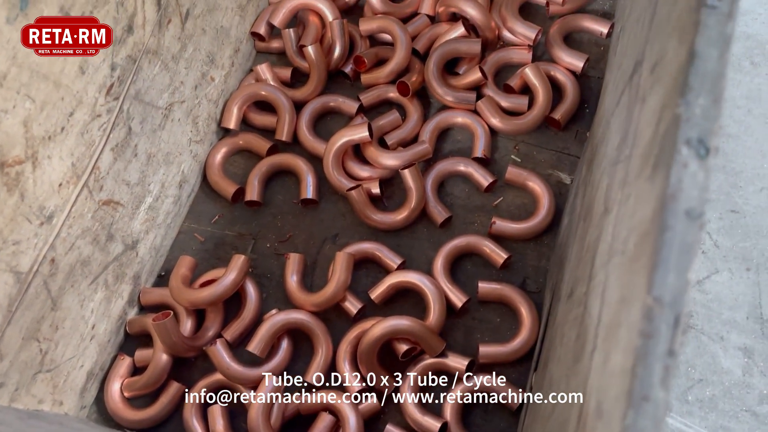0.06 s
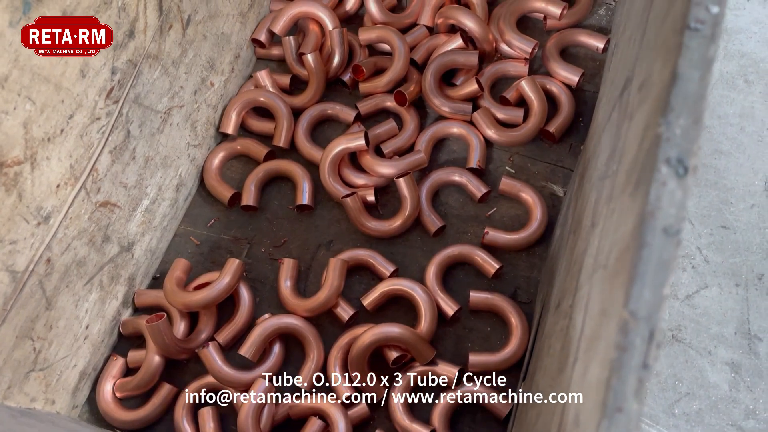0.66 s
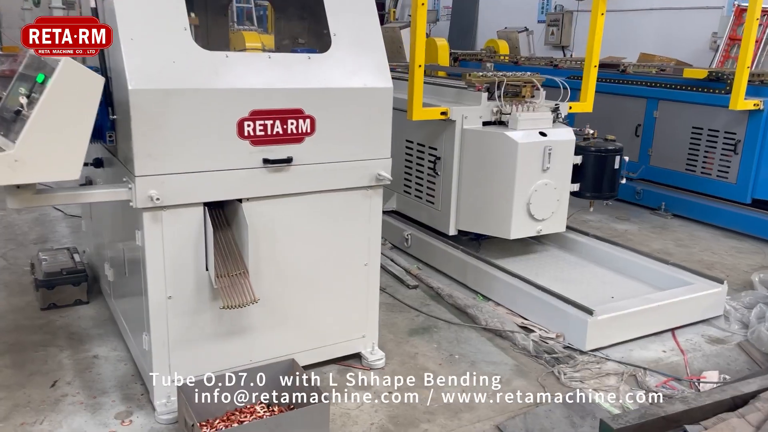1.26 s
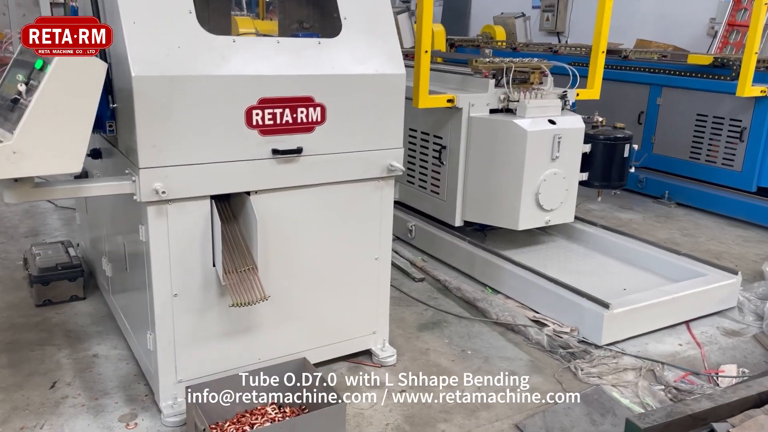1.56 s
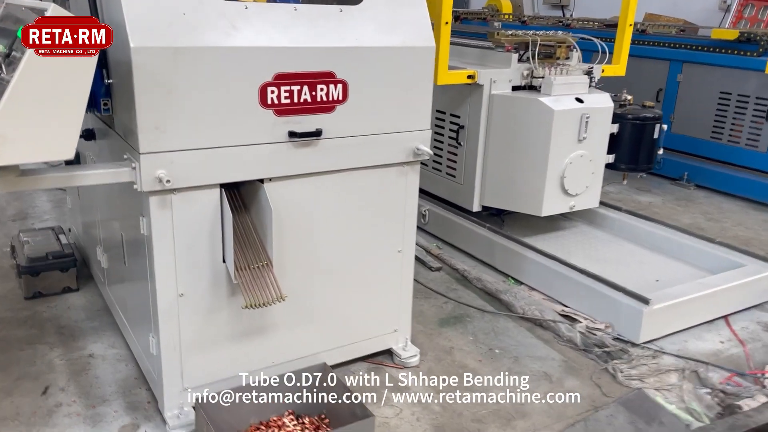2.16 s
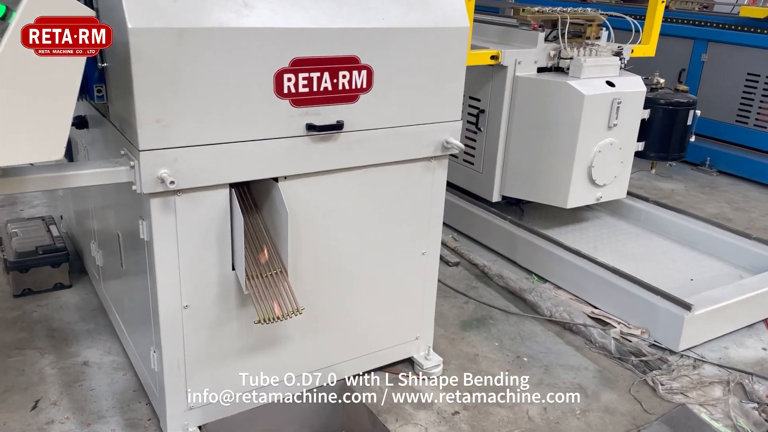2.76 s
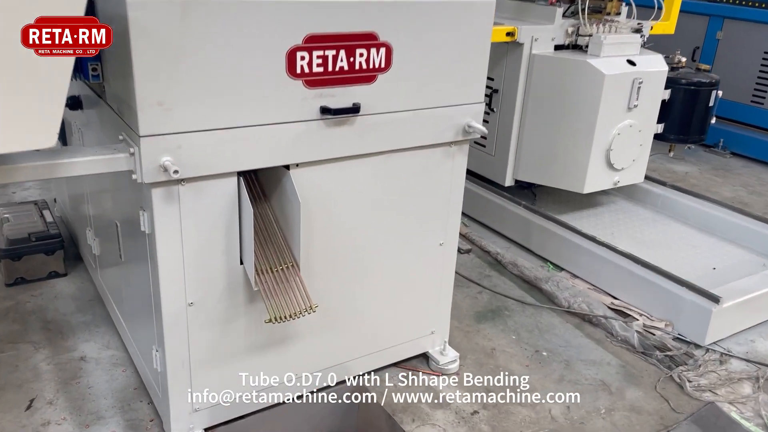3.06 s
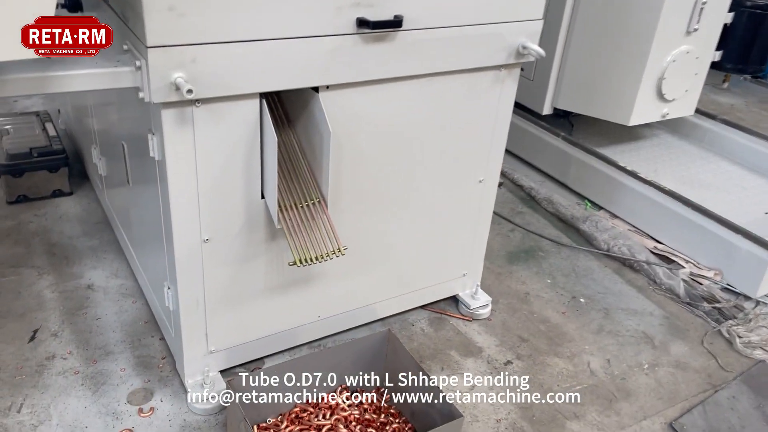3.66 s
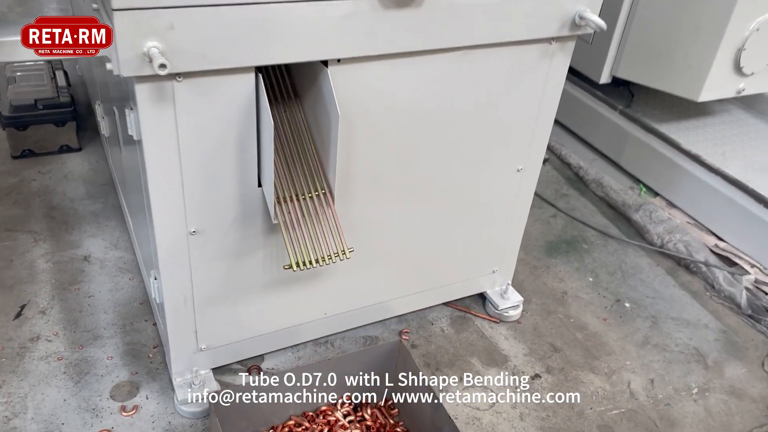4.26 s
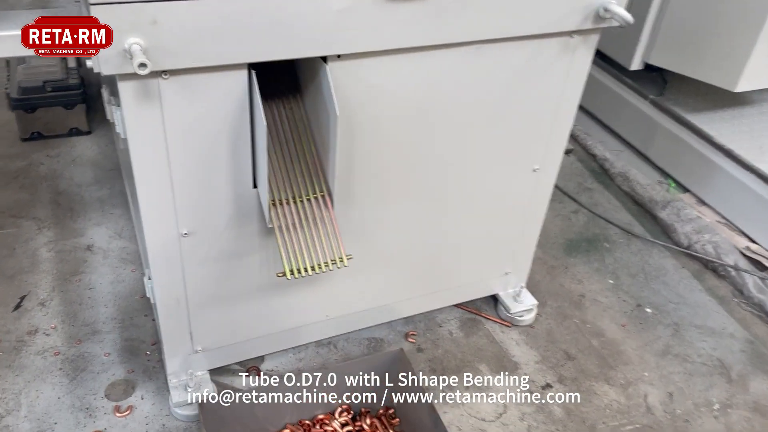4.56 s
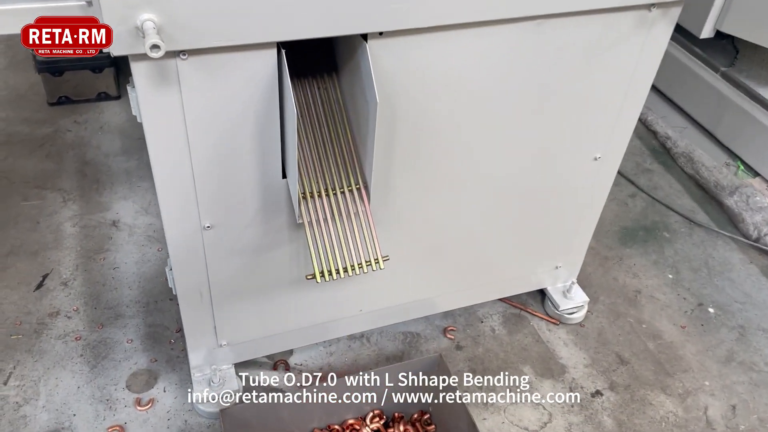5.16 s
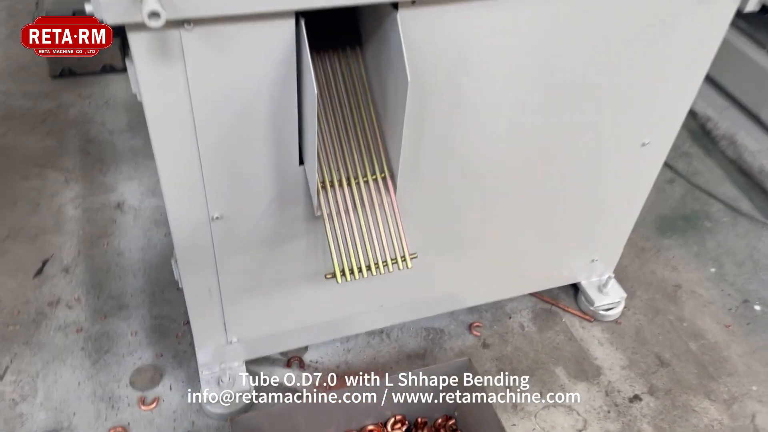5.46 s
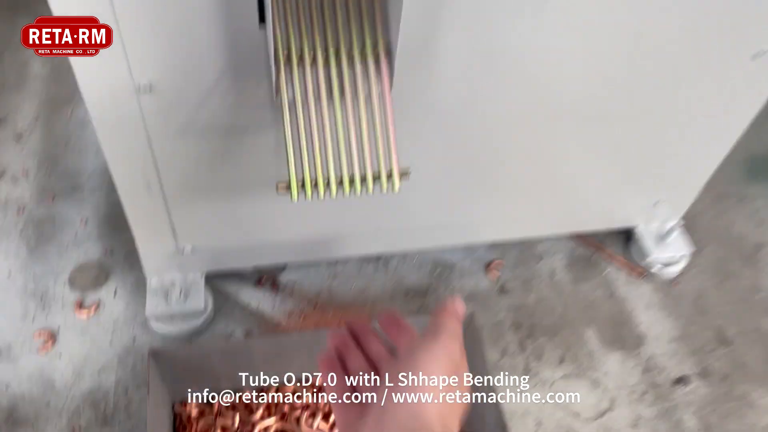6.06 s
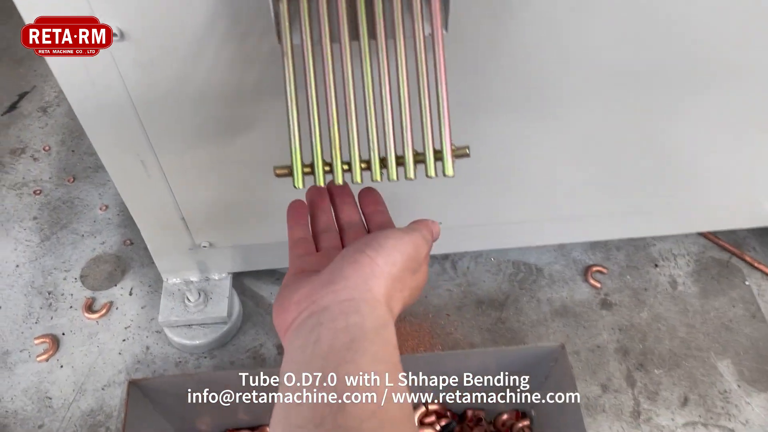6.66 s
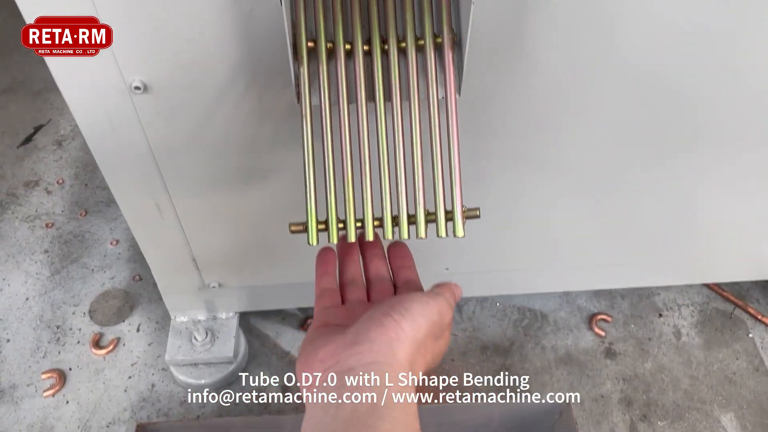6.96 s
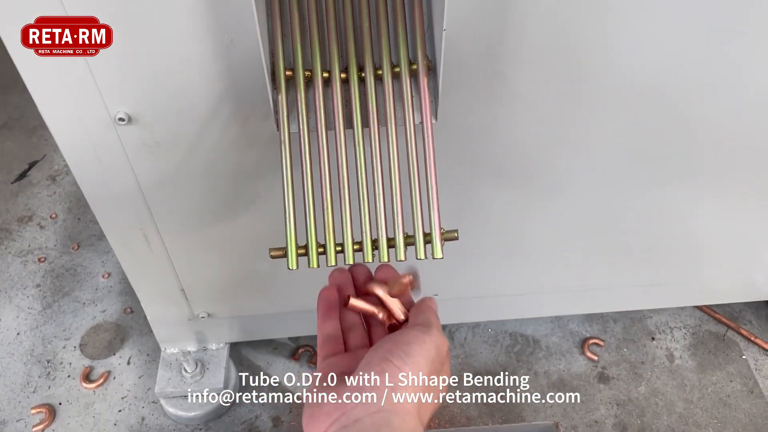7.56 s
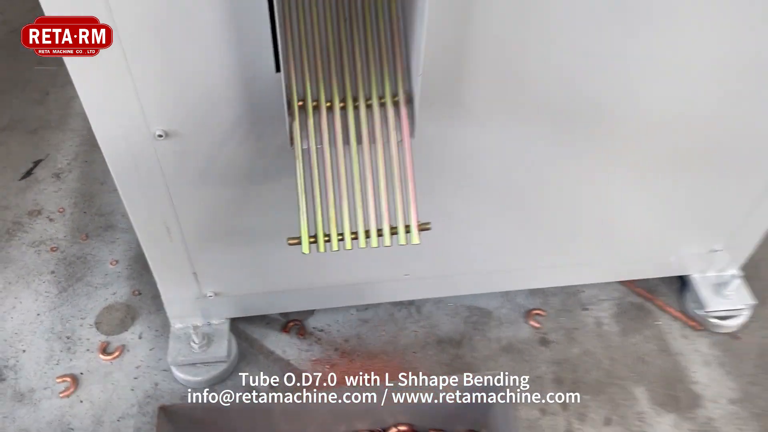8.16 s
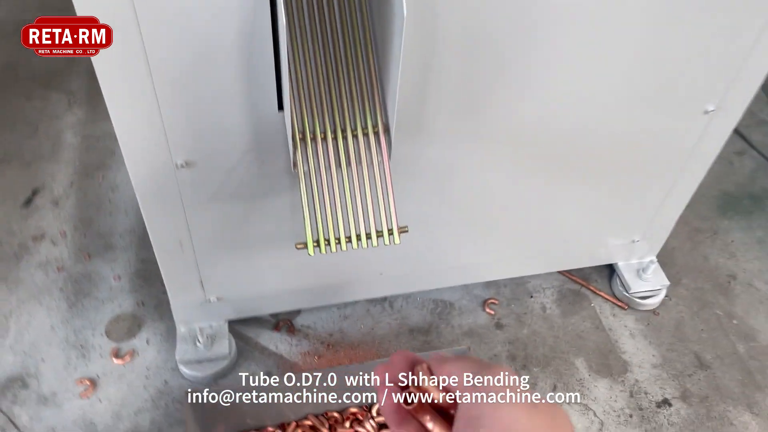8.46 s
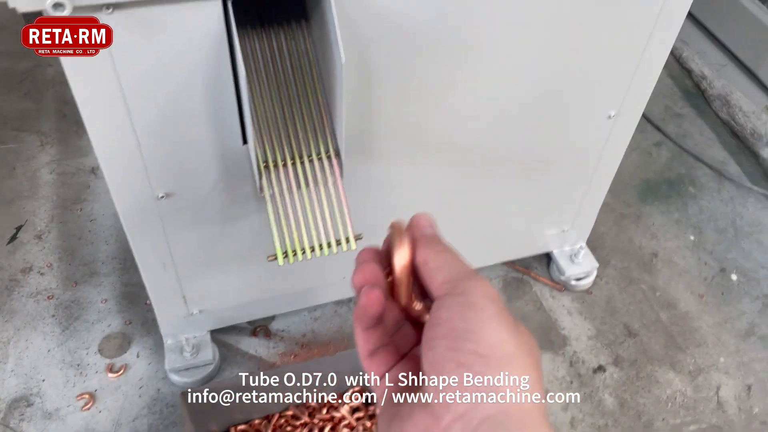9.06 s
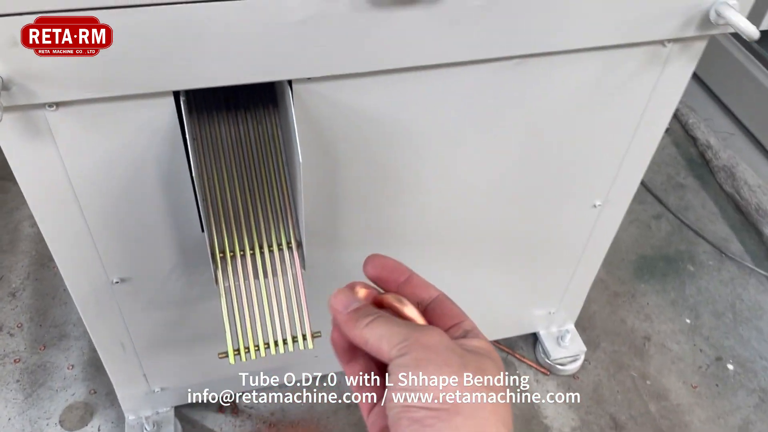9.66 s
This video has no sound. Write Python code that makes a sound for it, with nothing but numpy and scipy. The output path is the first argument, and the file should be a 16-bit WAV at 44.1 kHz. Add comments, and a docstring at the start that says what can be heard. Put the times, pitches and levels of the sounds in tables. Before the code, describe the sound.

In a factory hall, a moment of distant machine drone gives way suddenly to a close tube bender. A hydraulic hum swells and eases under irregular steel clacks, booming clamp knocks and low rumbles, with hissing air valves and short high whistles. Small metal parts drop sharply into a bin early on. The moving microphone ends up shielded by the machine's front, so the second cycle sounds softer.

```python
"""A moment of quieter shop noise with a drive coasting down, then an abrupt cut to a tube bender
already at work in the hall. In each cycle its hydraulic pump hums, the carriage rumbles, clamps knock
on the sheet-steel cabinet and dies clack; compressed air hisses, puffs from the valves and whistles
through a silencer. Finished bends drop into a bin. The moving microphone ends behind the front panel."""
import sys
import numpy as np
from scipy import signal
from scipy.fft import rfft, irfft
from scipy.io import wavfile

SR = 44100
rng = np.random.default_rng(int(sys.argv[2]) if len(sys.argv) > 2 else 0)


def waveform_to_disk(signal):
    """Save audio, clipped to [-1, 1], as 16-bit WAV at the path in sys.argv[1]."""
    frames = np.transpose(np.atleast_2d(signal))
    scaled = np.clip(frames, -1, 1) * 32767
    samples = np.round(scaled).astype(np.int16)
    wavfile.write(sys.argv[1], SR, samples)


N = 436590
TIME = np.arange(N) / SR
BINS = np.maximum(np.fft.rfftfreq(N, 1 / SR), 1)
CUT_S = .957   # the cut to the working machine
PERIOD_S = 4.696   # one work cycle; its tables give the times of the first round heard

# how openly the machine reaches the moving microphone: time_s, rumble_db, mechanism_db, air_db
EXPOSURE = [(1.0, 1.5, -0.5, -4), (1.6, 2, -1, -5.5), (2.3, -4.5, -2, 6.5), (3.3, 0.5, -2, -0.5),
            (4.5, -0.5, 2, 1), (5.6, -3, 1, -2), (6.1, 3, 3, 0), (6.5, -8, -5, -2.5), (6.9, -11, -10, 2),
            (7.5, -7.5, -6, 1.5), (8.3, -5.5, -6, -8), (9.0, -9.5, -8, -9), (9.9, -9.5, -7, -11.5)]


def from_db(db):
    """Decibels to gain."""
    return 10 ** (np.asarray(db) / 20)


def rms_one(x):
    """Scale to unit power."""
    return x / np.sqrt(np.mean(x ** 2) + 1e-20)


def cut(x, hz, kind, order):
    """Low-pass or high-pass."""
    return signal.sosfilt(signal.butter(order, min(hz, SR / 3), kind, fs=SR, output="sos"), x)


def at_hz(points, hz):
    """Read a table on a log-frequency axis."""
    points_hz, values = np.transpose(points)
    return np.interp(np.log(hz), np.log(points_hz), values)


def in_time(rows, clock=TIME):
    """Each column of a curve at every sample."""
    s, *columns = np.transpose(rows)
    return [np.interp(clock, s, column) for column in columns]


def in_cycle(rows):
    """A curve looped with the work cycle."""
    return in_time(rows, CUT_S + (TIME - CUT_S) % PERIOD_S)


def every_cycle(rows):
    """The events of the cycle, for two rounds."""
    return [(s + k * PERIOD_S, *rest) for k in range(2) for s, *rest in rows]


def drift(rate):
    """Smooth random motion of spread 1 that changes about rate times a second."""
    hop, settle = 40, 2000
    r = np.exp(-2 * np.pi * hop * rate / SR)
    slow = signal.lfilter([1], [1, -2 * r, r * r], rng.standard_normal(N // hop + settle + 2))[settle:]
    return np.interp(np.arange(N) / hop, np.arange(len(slow)), rms_one(slow))


def swell(s, rise, fall, shape=1):
    """Envelope with its top at s: shape 1 is an exponential spike, shape 2 a smooth bell."""
    distance = np.maximum((s - TIME) / rise, (TIME - s) / fall)
    return np.exp(-np.minimum(distance, 30) ** shape)


def switched(rows, idle_db, rise_s):
    """Attack, hold and release for each event of the cycle, added in power to an idle level."""
    power = from_db(idle_db) ** 2
    for s, hold, db, fade in every_cycle(rows):
        attack = np.clip((TIME - s) / rise_s, 0, 1)
        release = np.exp(-np.clip((TIME - s - hold) / fade, 0, 30))
        power = power + (from_db(db) * attack * release) ** 2
    return np.sqrt(power)


def resonate(x, modes):
    """Parallel resonances of (pitch_hz, width_hz, gain_db), signs alternating."""
    out = 0
    for k, (hz, width, db) in enumerate(modes):
        r = np.exp(-np.pi * width / SR)
        zeros = np.array([1, 0, -1]) * (1 - r * r) / 2
        poles = [1, -2 * r * np.cos(2 * np.pi * hz / SR), r * r]
        out = out + (-1) ** k * from_db(db) * signal.lfilter(zeros, poles, x + 1e-18)
    return out


def noise(spectrum):
    """A pair of noises with the given colour, rms 1."""
    return rms_one(irfft(rfft(rng.standard_normal((2, N))) * from_db(at_hz(spectrum, BINS)), N))


def narrow_noise(hz, width_hz):
    """A pair of noises narrowed to one singing band, rms 1."""
    mode = [(hz, width_hz, 0)]
    return rms_one(resonate(resonate(rng.standard_normal((2, N)), mode), mode))


def tone(hz, waver_db, smear):
    """A pair of sines whose level and phase wander among the hall's echoes."""
    phase = 2 * np.pi * np.cumsum(hz + np.zeros(N)) / SR + rng.uniform(0, 2 * np.pi)
    return np.array([np.sqrt(2) * from_db(waver_db * drift(5.3)) * np.sin(phase + smear * drift(2.3))
                     for _ in range(2)])


def struck(forces, modes, per_s, grain_db):
    """Loose parts rattle: dense uneven contacts ring a body's modes (one force for all, or one each)."""
    contacts = (rng.random((2, N)) < per_s / SR) * rng.choice([-1, 1], (2, N))
    contacts = contacts * from_db(grain_db * rng.standard_normal((2, N)))
    forces = np.broadcast_to(forces, (len(modes), N))
    rings = sum((-1) ** k * resonate(forces[k] * contacts, [mode]) for k, mode in enumerate(modes))
    return rings / np.std(resonate(contacts[0], modes))


def reverberation(x, t60, wall_hz):
    """The hall answers with a dull, dense tail."""
    t = TIME[:SR]
    tail = rng.standard_normal((2, SR)) * from_db(-60 * t / t60) * (t > .015)
    tail /= np.sqrt(np.sum(tail ** 2) / 2)
    return cut(signal.fftconvolve(x, tail, axes=1)[:, :N], wall_hz, "low", order=1)


def near_echoes(x, echo_db, sway_s):
    """Floor and panels reflect the treble; the paths shift as the microphone moves, combing the sound."""
    treble = cut(x, 1960, "high", order=2)
    echoes = 0
    for k, delay_s in enumerate(np.geomspace(.0025, .014, 8)):
        read = TIME - delay_s - sway_s * drift(.15)
        echoes = echoes + (-1) ** k * np.array([np.interp(read, TIME, side) for side in treble])
    return x + from_db(echo_db) * echoes


def diffuse(pair):
    """Mid and side become left and right, alike in the bass and mostly wider above."""
    # likeness of the two microphone ports: frequency_hz, coherence
    likeness = [(60, 1), (280, 0.9), (600, 0.57), (1500, 0.72), (3000, 0.61), (8000, 1), (15000, 0.064)]
    alike = np.clip(at_hz(likeness, BINS), 0, .999)
    mid, side = rfft(pair)
    return irfft(np.sqrt((1 + alike) / 2) * mid + np.sqrt((1 - alike) / 2) * side * [[1], [-1]], N)


def far_hall():
    """Distant machines drone and hum."""
    # room tone: frequency_hz, density_db
    colour = [(24, -43), (40, -22), (86, -22), (125, -15.5), (230, -22), (350, -14), (440, -24), (659, -18),
              (866, -27), (1060, -22.5), (1320, -28.5), (1550, -25), (2050, -34.5), (2280, -27),
              (2450, -35.5), (7680, -49.5), (15000, -63)]
    # steady hums: pitch_hz, level_db
    hums = [(59, -46.5), (124, -47.5), (300.5, -38), (323, -44), (655, -46), (1060, -53), (2309, -65)]
    hum = sum(from_db(db) * tone(hz, waver_db=1.5, smear=0.14) for hz, db in hums)
    return from_db(-37.0) * noise(colour) + hum


def coasting():
    """A drive that slows down whines on several partials that fall together."""
    # one falling glide for each run-down: time_s, pitch_hz, level_db
    glides = [
        [(0, 790, -56), (.17, 757, -47), (.3, 729, -43), (.41, 704, -38), (.52, 692, -44), (.63, 664, -33.5),
         (.8, 623, -41), (.92, 599, -42), (1.1, 572, -36), (1.3, 540, -39)],
        [(5.54, 826, -48), (5.62, 745, -31), (5.73, 634, -30), (5.88, 540, -50)],
    ]
    # partials of the whine: pitch_ratio, level_db
    partials = [(.187, -9.5), (1, 0), (1.333, -19), (1.6, -12)]
    out = 0
    for glide in glides:
        hz, db = in_time(glide)
        hz = hz * (1 + .005 * drift(6.0))
        turning = (TIME >= glide[0][0]) & (TIME < glide[-1][0])
        voice = sum(from_db(part_db) * tone(k * hz, waver_db=2.4, smear=.7) for k, part_db in partials)
        out = out + turning * from_db(db) * voice
    return out


def feed():
    """Sliding back while the pump rests, the feed rubs the tubes into a thin metallic ring."""
    # return slide in the cycle: start_s, hold_s, level_db, fade_s
    slides = [(2.05, 0.81, -41.5, 0.11)]
    # tube modes: pitch_hz, width_hz, gain_db
    tubes = [(445, 11, 19), (725, 14, 5), (1497, 50, -1), (1740, 130, 5), (4380, 86, -1), (4640, 80, -8),
             (4900, 80, 1), (5100, 70, -5), (5380, 56, -3)]
    ring = rms_one(resonate(rng.standard_normal((2, N)), tubes))
    return switched(slides, idle_db=-68, rise_s=0.13) * ring


def whine():
    """The drive sings in three narrow bands that carry past the front panel."""
    # whine bands: pitch_hz, width_hz, gain_db
    bands = [(1328, 41, -7), (2066, 116, -4), (3092, 220, -7)]
    # their shared fader: time_s, level_db
    fader = [(1.0, -48), (2.0, -39), (2.45, -41), (2.72, -35), (3.2, -41.5), (3.9, -41), (5.4, -35),
             (6.2, -43), (6.9, -57), (7.5, -54), (8.0, -40), (8.9, -46), (9.6, -40)]
    voice = sum(from_db(db + 1.2 * drift(1.5)) * narrow_noise(hz, width) for hz, width, db in bands)
    return from_db(in_time(fader)[0]) * voice


def motor_note(open_db):
    """A clean note just above the pump's, highest when the motor runs free and dragged down by work."""
    # the note through the cycle: time_s, pitch_hz, level_db
    note = [(.96, 310, -33), (1.5, 311, -37), (1.9, 319, -45), (2.25, 313, -42), (2.7, 312.5, -36),
            (3.0, 320.5, -33), (3.3, 320.3, -29), (4.1, 319.8, -28.5), (4.65, 313, -34), (5.0, 307, -37),
            (5.65, 310, -40)]
    hz, db = in_cycle(note)
    return from_db(db + open_db) * tone(hz, waver_db=1.0, smear=.12)


def pump_load():
    """Load and piston rate: the pump eases and slows a little while the air blows, then bears down."""
    # load through the cycle: time_s, load_db
    load = [(1.49, 0.5), (1.54, -9), (1.911, -9), (2.06, -21), (2.22, -17), (2.369, -21), (2.499, -8),
            (2.769, -8), (2.85, -4), (3.15, 0)]
    loaded_hz, sag_hz, eased_db = 261.5, 5.5, -20
    load_db, = in_cycle(load)
    return load_db, loaded_hz - sag_hz * (load_db / eased_db) ** 2


def oil(piston_hz, rush_db, whirr_db):
    """Oil rushes through the pump and rings its housing, pulsing with each piston."""
    # oil flow: frequency_hz, density_db
    colour = [(60, -4), (200, -6), (330, 6.5), (520, 3.5), (900, -2.5), (1500, -3.5), (2300, -6.5),
              (3200, -10.5), (4000, -18), (6000, -18), (10000, -32), (16000, -45)]
    # housing resonances: pitch_hz, width_hz, gain_db
    housing = [(727, 12, 3.5), (915, 21, 2), (1035, 18, 0.5), (1170, 92, -4.5), (1438, 35, 4),
               (1527, 56, 1.5), (1794, 37, -5.5), (2457, 33, 5.5), (3400, 110, 4.5)]
    flow = noise(colour)
    whirr = from_db(whirr_db) * sum(resonate(flow, [mode]) * from_db(2 * drift(.44)) for mode in housing)
    rush = from_db(rush_db + 1.4 * drift(17.0)) * noise(colour)
    pulse = 1 + 0.19 * np.sin(2 * np.pi * np.cumsum(piston_hz) / SR)
    return (rush + whirr) * pulse


def drive(open_db):
    """Oil noise, pump overtones and motor tones blend into a drone that partly follows the load."""
    # pump overtones: harmonic_number, level_db
    harmonics = [(2, -11), (4, -11.5), (5, -17.5), (8, -51)]
    # the third harmonic, with standing waves of its own: time_s, level_db
    third_fader = [(1.0, -47), (2.7, -49), (3.2, -37.5), (3.8, -39.5), (4.7, -36.5), (6.1, -40.5),
                   (6.5, -47), (7.7, -53.5), (8.2, -40), (9.0, -55), (9.9, -70)]
    # motor tones: pitch_hz, level_db
    motor_tones = [(64.6, -6.5), (124, -18), (184, -14.5), (300, -20.5), (457.6, -6)]
    load_db, piston_hz = pump_load()
    drone_db = -29.5 + 0.34 * load_db + open_db
    whirr_db = -34 + 0.13 * load_db + 0.5 * open_db   # the panel only partly screens the housing
    flow = oil(piston_hz, drone_db, whirr_db)
    overtones = sum(from_db(db) * tone(k * piston_hz, waver_db=3.5, smear=.26 * k) for k, db in harmonics)
    third = from_db(in_time(third_fader)[0]) * tone(3 * piston_hz, waver_db=2.5, smear=1.2)
    motor = sum(from_db(db) * tone(hz, waver_db=6.0, smear=1.67) for hz, db in motor_tones)
    return flow + from_db(drone_db - 3.5) * overtones + third + from_db(drone_db - 4.5) * motor


def carriage():
    """The carriage rumbles with each stroke and settles to a low idle."""
    # strokes in the cycle: start_s, hold_s, level_db, fade_s
    strokes = [(.96, 0.035, -28.5, 0.11), (1.29, 0.048, -22.5, 0.15), (1.49, 0.18, -23, 0.16),
               (2.23, 0.09, -28.5, 0.2), (2.8, 0.22, -23, 0.13), (3.62, 0.053, -35.5, 0.076),
               (3.98, 0.067, -24, .03), (4.18, 0.044, -21.5, 0.21), (4.35, 0.19, -18.5, 0.35),
               (5.02, 0.031, -19.5, .05), (5.25, 0.073, -27, 0.096), (5.52, 0.12, -24.5, 0.39)]
    # rumble: frequency_hz, density_db
    colour = [(25, -29), (42, -28), (66, 4), (95, 3), (150, -6), (190, -3.5), (240, -4.5), (340, -8),
              (480, -12.5), (700, -15.5), (1500, -54)]
    return switched(strokes, idle_db=-37, rise_s=0.011) * noise(colour)


def leak():
    """Compressed air leaks with a fluttering hiss, louder while a valve is open."""
    # valve openings in the cycle: start_s, hold_s, level_db, fade_s
    valves = [(1.0, 0.37, -34.5, 0.025), (1.458, 0.29, -20.5, 0.12), (1.97, 0.32, -33.5, 0.071),
              (2.4, 0.42, -41.5, .06), (3.47, 0.075, -31, 0.16), (3.93, 0.29, -41, .04),
              (4.575, 0.71, -30, 0.06)]
    # hiss: frequency_hz, density_db
    colour = [(300, 8.5), (1100, 4), (1650, 8), (2300, 6), (3500, 5.5), (5200, 5.5), (7000, 12), (8400, 3),
              (9200, 11.5), (10400, 4.5), (12500, 4), (14300, -4), (15400, 12), (16000, 3.5)]
    return switched(valves, idle_db=-40, rise_s=0.017) * from_db(.8 * drift(9.0)) * noise(colour)


def exhaust():
    """Valves open and close smoothly, each puff a mix of rush, nozzle ring and top-end sizzle."""
    # puffs in the cycle: peak_s, level_db, rise_s, fall_s, ring_db, sizzle_db
    puffs = [(1.61, -25, .025, 0.018, 0, 3), (1.695, -28, 0.047, 0.07, 14.5, 12),
             (1.952, -24.5, 0.95, 0.007, -4, 2), (1.94, -31.5, 0.02, .06, 2, 12),
             (4.388, -23, 0.024, 0.044, -2.5, -1), (5.54, -21, 0.1, 0.14, -21, -12)]
    # jet rush: frequency_hz, density_db
    colour = [(800, -1.5), (2200, 0.5), (3200, 1.5), (5500, -9.5), (7500, -4), (9000, -24), (11300, -5.5),
              (16000, -15)]
    rush, nozzle = noise(colour), narrow_noise(hz=6800, width_hz=2600)
    body, sizzle = cut(rush, 9000, "low", order=6), cut(rush, 9000, "high", order=6)
    out = 0
    for s, db, rise, fall, ring_db, sizzle_db in every_cycle(puffs):
        jet = body + from_db(ring_db) * nozzle + from_db(sizzle_db) * sizzle
        out = out + from_db(db - 5.0) * swell(s, rise, fall, shape=2) * jet
    return out * from_db(.8 * drift(25))


def silencer():
    """Venting air whistles through the silencer's narrow resonance."""
    # vents in the cycle: peak_s, level_db, fade_s
    vents = [(1.952, -24, .035), (2.062, -31.5, .045), (2.175, -33, .05)]
    envelope = sum(from_db(db) * swell(s, 0.024, fade) for s, db, fade in every_cycle(vents))
    return envelope * narrow_noise(hz=8750, width_hz=700)


def clacks():
    """Steel dies meet and finished bends drop down the chute: a clack with a short bright snap."""
    # dies meeting in the cycle: peak_s, level_db, rise_s, rattle_s, snap_db
    closings = [(1.294, -17.5, 0.0067, 0.017, -30), (1.481, -15.5, 0.00091, 0.055, -20),
                (1.604, -20.5, 0.027, 0.029, -6), (2.238, -18.5, 0.0044, 0.09, -28),
                (2.81, -20, 0.03, 0.15, -11), (2.892, -22.5, 0.019, 0.065, -8.5),
                (3.616, -8.5, 0.0007, 0.041, -21), (4.18, -24, 0.025, 0.21, -30),
                (4.378, -15, 0.026, 0.13, -12), (5.53, -18, 0.018, 0.035, -3.5),
                (5.58, -20, 0.022, 0.068, -31)]
    # bends falling into the bin, played once: peak_s, level_db, rise_s, rattle_s, snap_db
    drops = [(2.75, -10, 0.0082, 0.015, .5), (2.975, -5, 0.0033, 0.011, -5), (3.08, -25, .015, .025, 0)]
    # die modes: pitch_hz, width_hz, gain_db
    modes = [(674, 63, 8), (785, 170, 3.5), (890, 143, 4), (1166, 185, 3.5), (1482, 50, 5),
             (1736, 100, 0.5), (2104, 210, 1.5), (2370, 230, -2.5), (3030, 470, -6)]
    body_force, snap_force = 0, 0
    for s, db, rise, rattle, snap_db in every_cycle(closings) + drops:
        force = from_db(db) * swell(s, rise, rattle, shape=1.6)   # brief chatter, then a firm seat
        body_force = body_force + force
        snap_force = snap_force + from_db(snap_db) * force
    body = struck(body_force, modes, per_s=2300, grain_db=5.5)
    body = cut(body, 2820, "low", order=4)   # heavy dies ring little above this
    snap = struck(snap_force, [(3780, 13200, 4.8), (6800, 9700, 5.66)], per_s=3700, grain_db=2.0)
    return from_db(-7.0) * body + from_db(-6.0) * snap


def clamps():
    """Each clamp booms on the cabinet and rattles; where it lands decides which modes ring most."""
    # blows in the cycle: peak_s, rattle_db, rise_s, rattle_s, centre_hz, impact_db
    knocks = [(1.308, -10.5, 0.008, 0.028, 390, -10.5), (1.405, -15, 0.016, 0.062, 338, -15),
              (1.484, -10.5, 0.0035, 0.085, 490, -1), (2.236, -16, 0.0019, 0.035, 520, -11),
              (2.787, -8.5, 0.0014, 0.016, 460, -.5), (2.819, -12.5, 0.0023, 0.025, 420, -3),
              (2.839, -19, 0.0022, .02, 440, -10), (2.89, -20, .002, 0.044, 320, -18),
              (4.18, -10, 0.018, 0.025, 305, -13), (4.36, -14, 0.016, 0.031, 350, -8),
              (4.434, -12, 0.0052, 0.018, 390, -12), (5.03, -15, 0.02, 0.044, 318, -18),
              (5.565, -13.5, 0.047, 0.069, 332, -22)]
    # sheet-steel cabinet modes: pitch_hz, width_hz, gain_db
    modes = [(75, 50, -2.5), (176, 62, 2.5), (248, 34, 1.5), (302, 20, 3), (363, 21, 2), (401, 32, 7.5),
             (446.6, 26, 3), (516, 21, 3), (589, 46, -1.5), (665, 44, -1), (920, 310, -9),
             (1480, 380, -9.5)]
    focus_db, focus_octaves = 9.5, 0.22   # modes far from a blow's centre ring this much less
    blows = every_cycle(knocks)
    peak_s, _, _, _, centre_hz, impact_db = np.transpose(blows)
    octaves = np.log2(np.array(modes)[:, :1] / centre_hz)
    focus = from_db(focus_db * (np.exp(-(octaves / focus_octaves) ** 2) - 1))
    chance = rng.standard_normal((len(blows), 2, len(modes))).T
    polarity, scatter_db = np.sign(chance[:, 0]), -1.5 * chance[:, 1]
    # an impact spreads over more modes than a rattle
    strengths = np.sqrt(focus) * polarity * from_db(33 + impact_db + scatter_db)
    onsets = (peak_s * SR).astype(int)
    rings = sum(resonate(np.bincount(onsets, strength, N)[:N], [mode])
                for strength, mode in zip(strengths, modes))
    boom = cut(rings, 1000, "low", order=2) * np.array([[1], [0]])   # soft contact, in the mid only
    pushes = np.array([from_db(db) * swell(s, rise, fall) for s, db, rise, fall, *_ in blows])
    rattle = struck(focus @ pushes, modes, per_s=1300, grain_db=-0.5)
    return boom + from_db(1.5) * rattle


def pump():
    """The pistons' strong fundamental, swelling and fading with load and position."""
    # full-load hum as the microphone crosses standing waves: time_s, level_db
    fader = [(1.0, -25.5), (1.2, -22), (1.5, -18.5), (1.8, -14), (2.2, -22), (2.95, -23.5), (3.55, -19.5),
             (4.35, -17.5), (4.55, -21), (5.25, -13.5), (5.75, -19.5), (6.17, -17), (6.26, -23.5),
             (7.2, -25), (7.85, -22), (8.4, -25.5), (9.15, -25), (9.9, -19.5)]
    # its pan: time_s, left_over_right_db
    pan = [(1.0, 5), (1.7, 0.5), (2.3, -1.5), (2.9, -0.5), (3.5, -2), (4.1, 2.5), (4.75, 5), (5.5, 4),
           (6.0, -2.5), (8.2, 0.5), (8.8, 3), (9.9, 1.5)]
    (db,), (pan_db,) = in_time(fader), in_time(pan)
    load_db, piston_hz = pump_load()
    hum = tone(piston_hz, waver_db=.6, smear=0.046)[0]
    return from_db(db + load_db + pan_db * np.array([[.5], [-.5]])) * hum


def scene():
    """Room tone cuts to the machine already at work, its blows ringing out in the hall."""
    rumble_db, mechanism_db, air_db = in_time(EXPOSURE)
    after_cut = np.clip((TIME - CUT_S) / .025 + .5, 0, 1)
    hits = from_db(mechanism_db) * (clacks() + clamps())
    hits = hits + from_db(-8.5) * reverberation(hits, t60=0.72, wall_hz=3000)
    background = (1 - after_cut) * far_hall() + coasting()
    works = drive(mechanism_db) + from_db(rumble_db) * carriage()
    works = works + motor_note(mechanism_db) + whine() + feed()
    air = from_db(air_db) * (leak() + exhaust() + silencer())
    mix = background + after_cut * (works + air) + hits
    return diffuse(near_echoes(mix, echo_db=-13, sway_s=.0002)) + after_cut * pump()


def record(dry):
    """Two ports hear the treble out of phase; a quick fade-in, rounded peaks, deep bass and top cut."""
    # phase between the microphone ports: frequency_hz, phase_rad
    port_phase = [(100, 0), (1800, .2), (3270, -1), (4130, -.2), (5800, -1.3), (6800, -3.1), (8350, -3.1),
                  (10200, -1), (11400, 0), (14600, 1.5)]
    sides = np.array([[.5], [-.5]])
    turn = np.exp(1j * at_hz(port_phase, BINS) * sides)
    balance_db = at_hz([(250, -1.0), (700, -3.0), (1500, 1.2), (5500, -5), (9000, 1.0)], BINS)
    heard = irfft(rfft(dry) * turn * from_db(balance_db * sides), N)
    heard = cut(heard, 36, "high", order=4) * np.minimum(TIME / .008, 1) ** 2
    rounded = 1.3 * np.tanh(heard / 1.3)
    return signal.sosfilt(signal.ellip(12, .1, 80, 15900, fs=SR, output="sos"), rounded)


dry = scene()
out = record(dry)
waveform_to_disk(out)
```